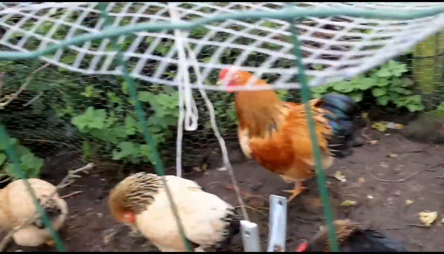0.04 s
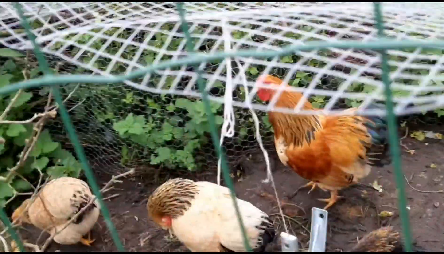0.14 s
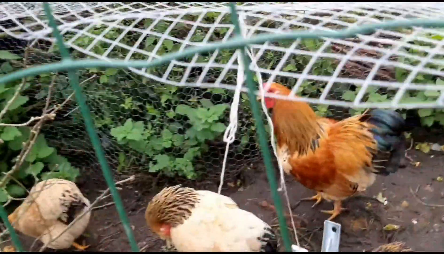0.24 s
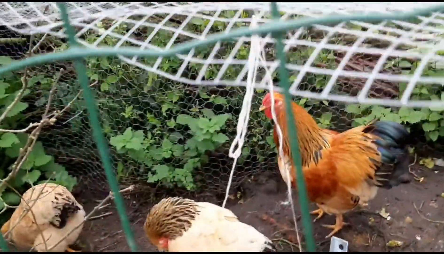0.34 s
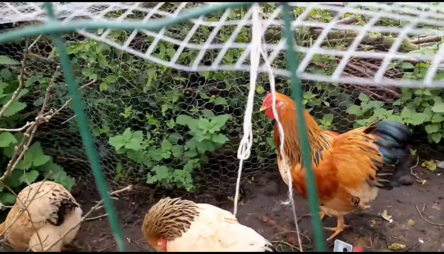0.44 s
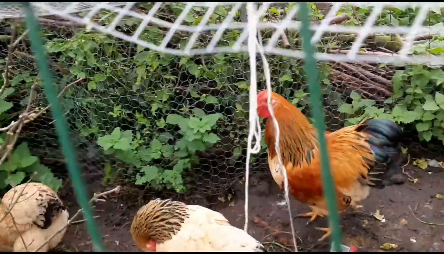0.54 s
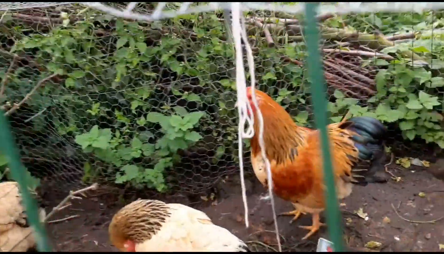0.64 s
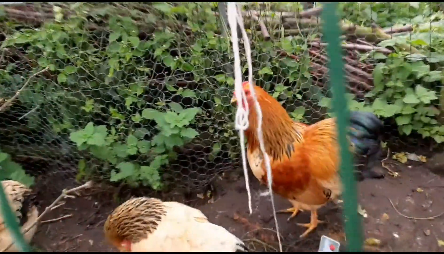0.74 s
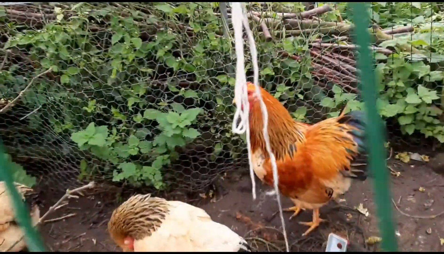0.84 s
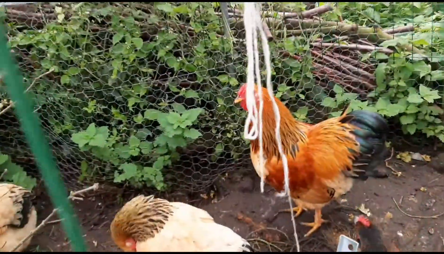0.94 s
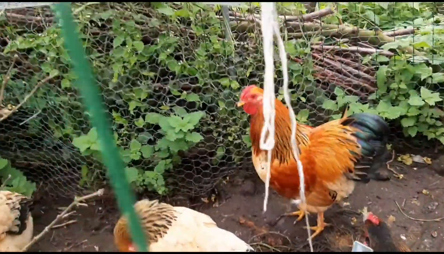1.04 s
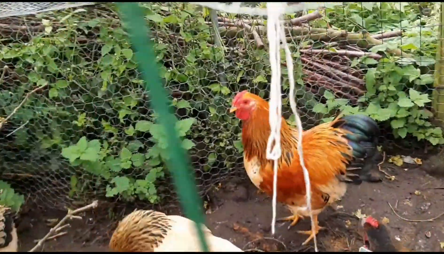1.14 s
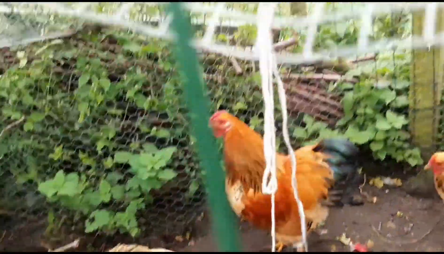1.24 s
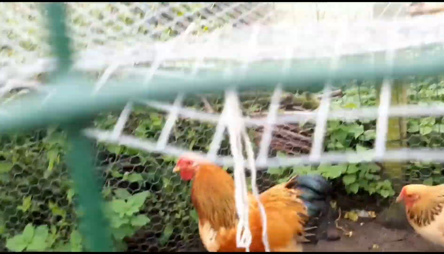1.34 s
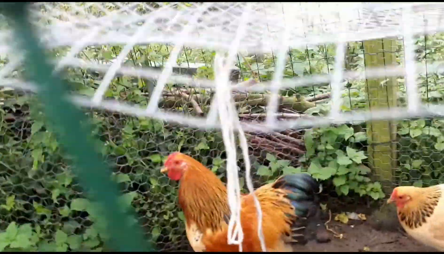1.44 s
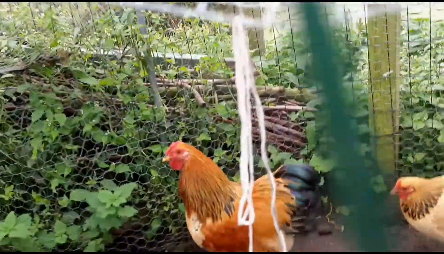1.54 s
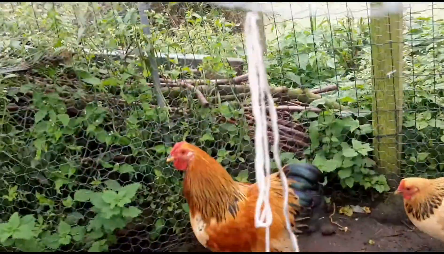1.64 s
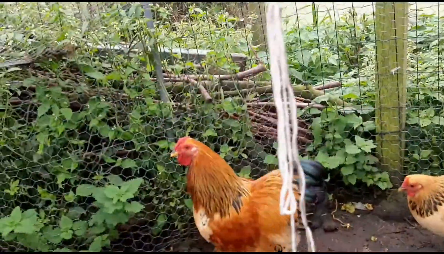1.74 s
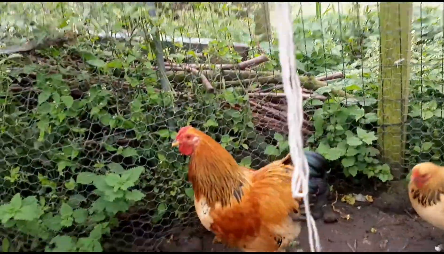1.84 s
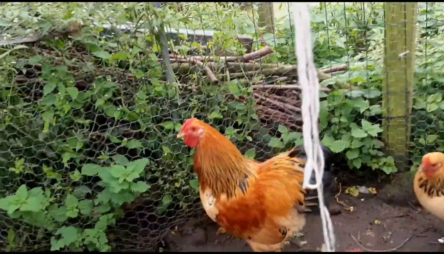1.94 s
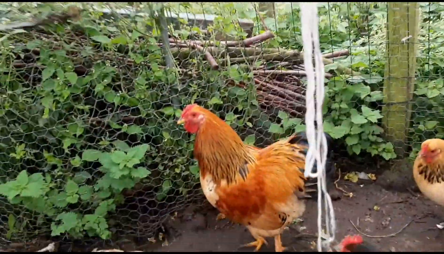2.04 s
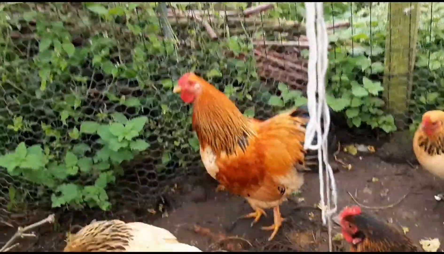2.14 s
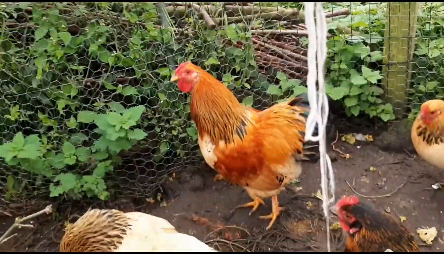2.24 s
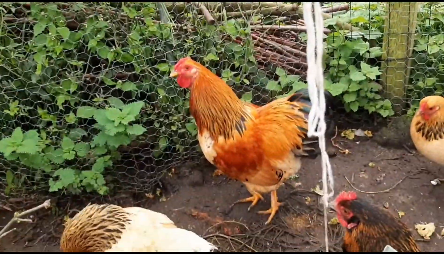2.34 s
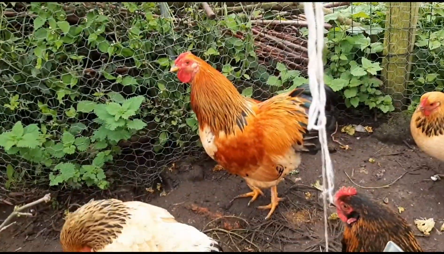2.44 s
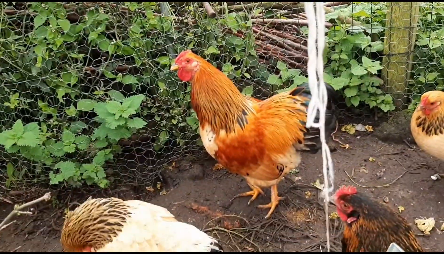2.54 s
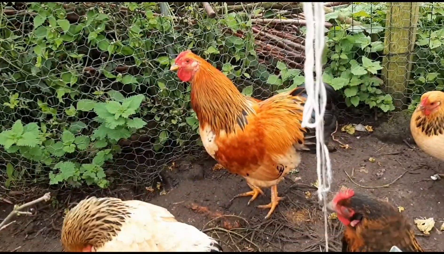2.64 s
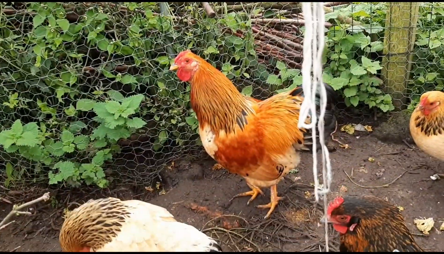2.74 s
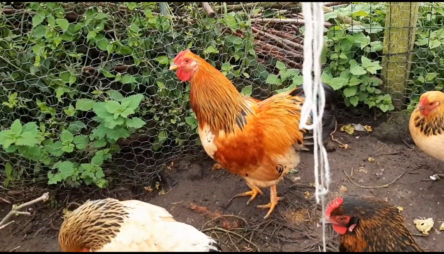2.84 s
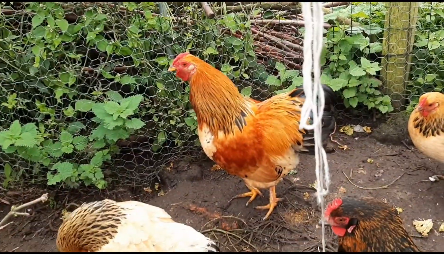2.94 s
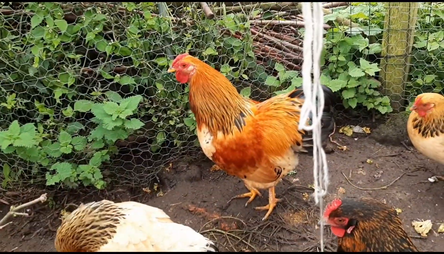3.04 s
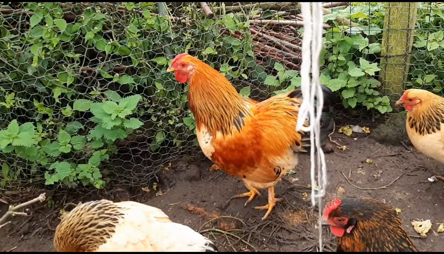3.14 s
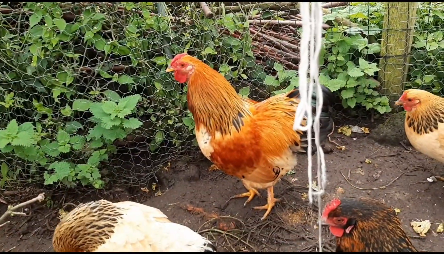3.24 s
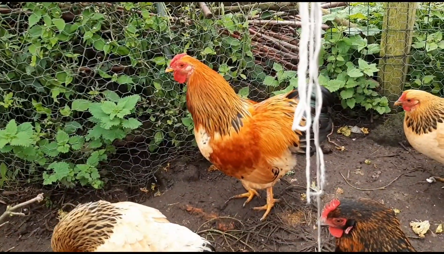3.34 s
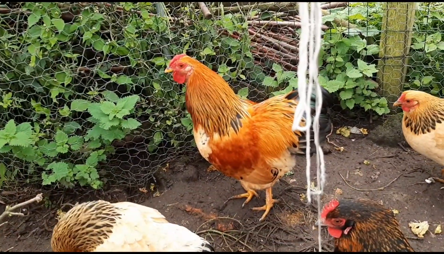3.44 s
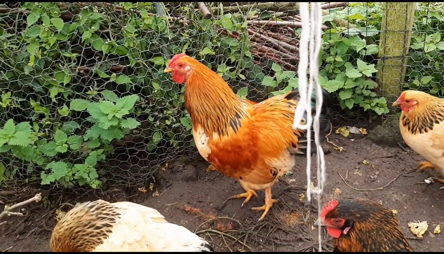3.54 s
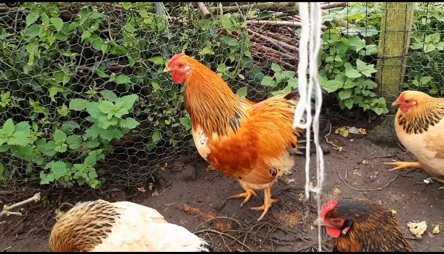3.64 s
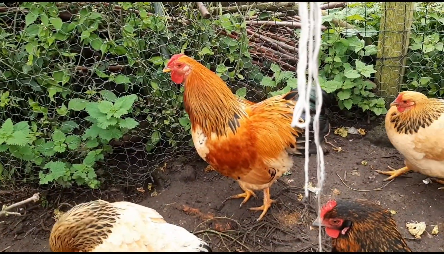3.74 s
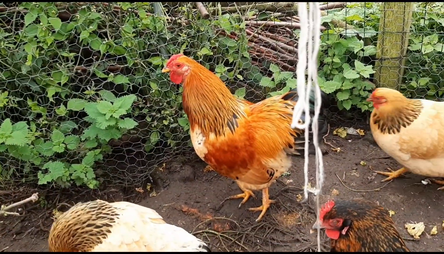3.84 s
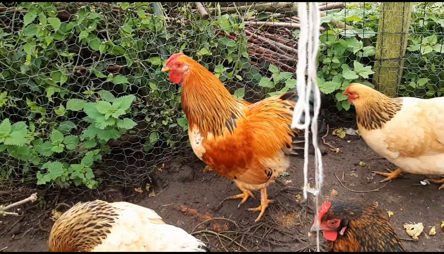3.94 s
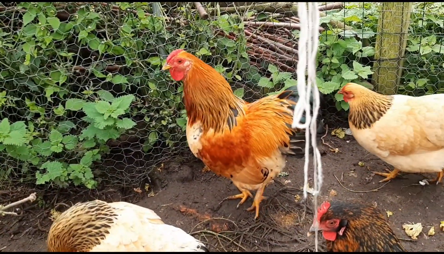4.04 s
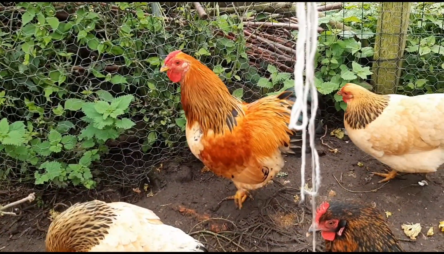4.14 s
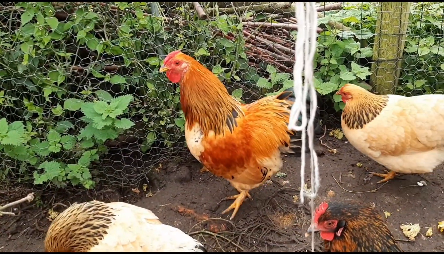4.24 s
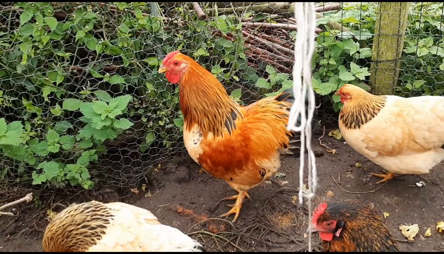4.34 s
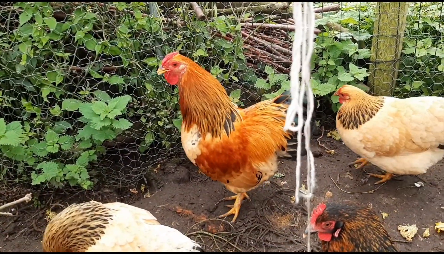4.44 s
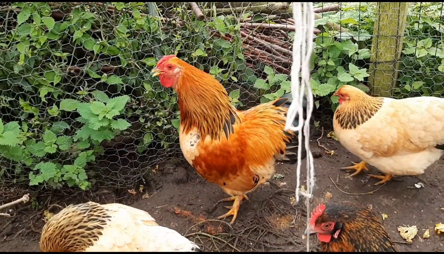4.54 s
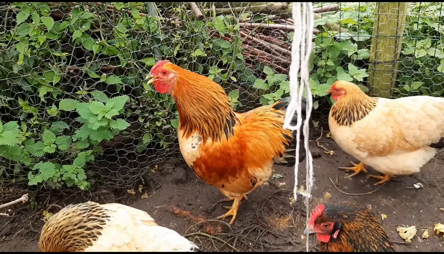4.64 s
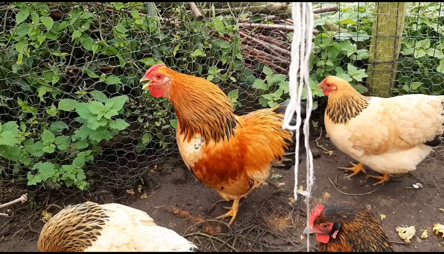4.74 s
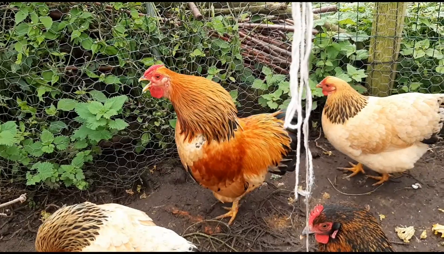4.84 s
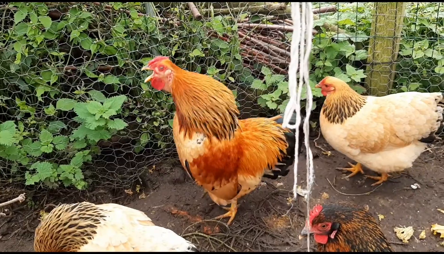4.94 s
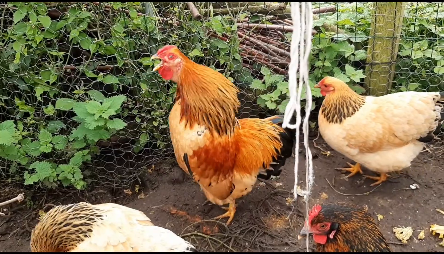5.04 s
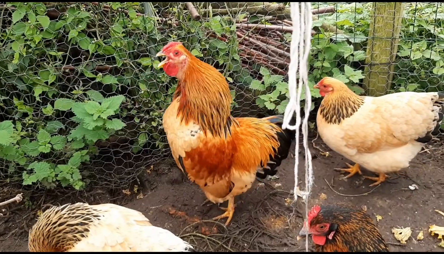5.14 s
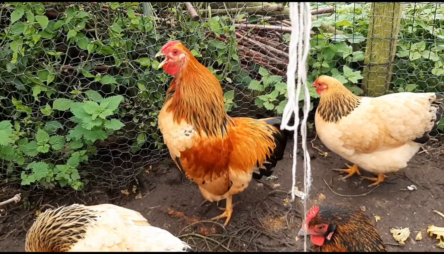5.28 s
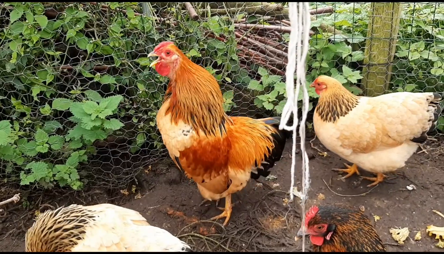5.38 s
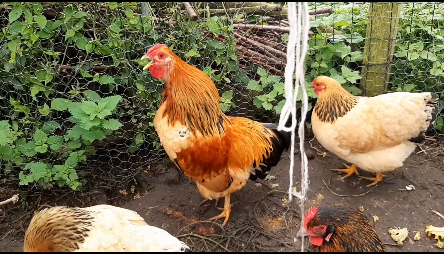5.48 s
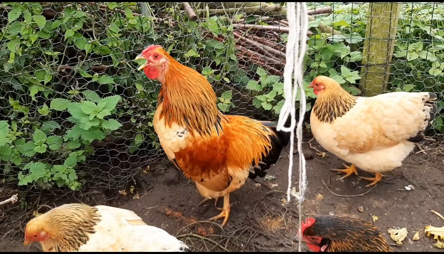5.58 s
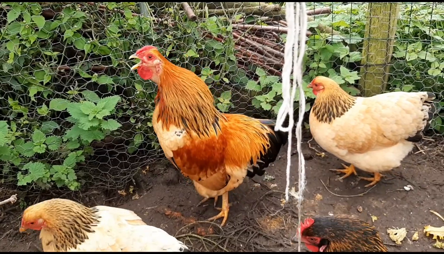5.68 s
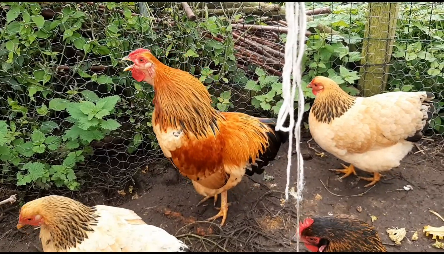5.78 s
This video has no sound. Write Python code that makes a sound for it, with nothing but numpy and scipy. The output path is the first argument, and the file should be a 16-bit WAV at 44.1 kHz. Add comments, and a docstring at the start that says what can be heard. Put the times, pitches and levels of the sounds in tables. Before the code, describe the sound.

A backyard chicken run heard through a hand-held phone, with treble cut off at the very top. From 0 to about 1.7 s netting drags over the phone in short, uneven crackling strokes, with dry twig-like ticks and sharp snaps carrying dull knocks; the hardest cluster comes at 0.8-0.9 s, another at 1.25-1.35 s. Lighter brushing and ticks continue until about 2.5 s, then fade to sparse clicks. Low, buffeting air rumble and a very faint hush lie beneath. Between 3.0 and 4.0 s a hen gives a few soft, short, bending clucks. A crisp tick falls at 4.14 s and the rumble swells near 4.9 s. At 5.07 s a rooster crows, far louder than everything else: two hoarse, raspy syllables run together until 5.29 s, a brief gap, then at 5.34 s a note cracks sharply upward, settles clear and bright, and holds until the cut near 5.8 s.

```python
"""A rooster crows: two hoarse short syllables, run together, then after a brief gap a high cracked note
that is held to the end. Before it a hen gives a few soft clucks. Both voices are sums of harmonics.
A hand-held phone is pushed under the netting of a backyard chicken run: the net scrapes, ticks and snaps
close to the microphones, built from tiny random slips that ring. Filtered noise makes a low rumble of
moving air and a faint hush."""
import sys
import numpy as np
from scipy import signal
from scipy.fft import rfft, irfft
from scipy.io import wavfile
from scipy.ndimage import uniform_filter1d

SR = 44100
rng = np.random.default_rng(int(sys.argv[2]) if len(sys.argv) > 2 else 0)


def transcribe(u):
    """Save the signal u as a 16-bit wav file named by the first command-line argument.

    u: samples, shape (n,) or (channels, n), limited to [-1, 1]; the rate is SR.
    q: integer samples, one column per channel.
    """
    v = np.clip(np.atleast_2d(u).T, -1, 1)
    q = np.round(v * 32767).astype(np.int16)
    wavfile.write(sys.argv[1], SR, q)


N = 256220
T = np.arange(N) / SR


def undb(db):
    """Decibels to gain."""
    return 10 ** (np.asarray(db) / 20)


def curves(rows):
    """Each column of a table, joined by straight lines in time."""
    s, *columns = np.transpose(rows)
    return [np.interp(T, s, c) for c in columns]


def unit(x):
    """Scale to rms 1."""
    return x / np.sqrt(np.mean(x ** 2))


def gain_at(hz, points):
    """Gain at any frequency, read between the points of a colour table."""
    f, db = np.transpose(points)
    return undb(np.interp(np.log(hz + 1), np.log(f), db))


def colour(x, points):
    """Filter with the given colour and unit power gain, without pre-echo; it falls below the lowest point."""
    hz = np.fft.rfftfreq(2 * N, 1 / SR)
    low_fall = np.clip(hz / points[0][0], 1e-2, 1) ** 2
    gain = unit(gain_at(hz, points) * low_fall)
    # folding the cepstrum makes the filter respond only after its input
    cepstrum = irfft(np.log(gain))
    cepstrum[1:N] *= 2
    cepstrum[N + 1:] = 0
    return irfft(rfft(x, 2 * N) * np.exp(rfft(cepstrum)))[..., :N]


def wander(lo_hz, hi_hz):
    """Random motion between two rates, spread 1."""
    band = signal.butter(2, [lo_hz, hi_hz], "band", fs=SR, output="sos")
    return unit(signal.sosfilt(band, rng.standard_normal(N)))


def resonate(x, hz, q):
    """One resonance, with unit power gain."""
    return signal.lfilter(*signal.iirpeak(hz, q, fs=SR), x) * np.sqrt(SR * q / (np.pi * hz))


def ramp(start_s, length_s):
    """Rises from 0 to 1 over the given time and stays there."""
    return np.clip((T - start_s) / length_s, 0, 1)


def swell(s, half_s):
    """Comes and goes smoothly around time s."""
    return np.exp(-((T - s) / half_s) ** 2)


# level of the low rumble, which swells and sinks: time_s, level_db
RUMBLE_LEVEL = [(0, -47), (0.7, -42.5), (1.8, -45.5), (2.2, -43), (3.9, -41.5), (4.3, -41.5), (4.9, -36.5),
                (5.15, -45.5), (5.7, -54)]
# colour of that moving air: frequency_hz, relative_level_db (per Hz)
RUMBLE_COLOUR = [(25, -44.5), (45, -4), (65, 4), (120, 1.5), (200, -6.5), (300, -16), (600, -24),
                 (1300, -57.5)]
# colour of the open air in the garden: frequency_hz, relative_level_db (per Hz)
HUSH_COLOUR = [(300, -13), (1000, -5.5), (2300, -17.5), (3200, -23), (4600, -18.5), (7000, -29.5),
               (11500, -43)]


def air(side_db=-7, buffet_db=3.0, garden_db=-61):
    """Air buffets the microphones, mostly alike on both; the garden adds a faint steady hush."""
    rumble_level_db, = curves(RUMBLE_LEVEL)
    mid, side = rng.standard_normal((2, N))
    ports = mid + undb(side_db) * side * np.array([[1], [-1]])
    buffets = undb(buffet_db * wander(1.64, 24.2))
    rumble = unit(colour(ports, RUMBLE_COLOUR) * buffets) * undb(rumble_level_db)
    hush = colour(rng.standard_normal((2, N)), HUSH_COLOUR) * undb(garden_db)
    return rumble + hush


GRIP_S, SLIP_S = 0.017, 0.025  # a stroke builds up, and dies away after its end


def stroke(s, length):
    """The net grips, slides steadily and lets go."""
    return ramp(s, GRIP_S) * np.exp(-np.maximum(T - s - length, 0) / SLIP_S)


def grains(per_cycle, spread_db):
    """Tiny slips of unequal size, each ringing briefly at its own pitch; the high ones crowd into a hiss."""
    out = np.zeros((2, N))
    for hz in np.geomspace(350, 10500, 13):
        # higher pitches slip more often
        hit = rng.random((2, N)) < per_cycle * hz / SR
        size_db = spread_db * np.minimum(rng.exponential(size=hit.sum()), 4)
        slips = np.zeros((2, N))
        slips[hit] = rng.choice([-1, 1], hit.sum()) * undb(size_db)
        out += resonate(slips, hz, q=3)
    return unit(out)


def patchy(x, depth_db):
    """The contact keeps shifting, so the colour changes in patches of some tens of milliseconds."""
    frames = signal.stft(x, nperseg=256)[2]
    field = rng.standard_normal(frames.shape[1:])
    for _ in range(2):
        field = uniform_filter1d(field, 5, axis=0)  # across frequency
        field = uniform_filter1d(field, 10, axis=1)  # across time
    return signal.istft(frames * undb(depth_db * unit(field)))[1][:, :N]


# between strokes the net brushes lightly, until the phone is clear of it
BRUSH_DB, CLEAR_S, CLEARING_DB_PER_S = -54, 2.44, 14
# strokes of the net over the phone: start_s, length_s, crackle_level_db, drag_level_db
NET_STROKES = [(0.0, 0.16, -43, -47), (0.337, 0.11, -45, -47.5), (0.464, 0.044, -37.5, -63),
               (0.59, 0.14, -43, -45.5), (0.804, 0.12, -44, -43), (0.973, 0.088, -44.5, -61),
               (1.146, 0.086, -44, -67), (1.25, 0.097, -39.5, -42.5), (1.615, 0.075, -44.5, -41),
               (1.964, 0.37, -49.5, -58), (2.532, 0.037, -48.5, -51)]
# colour of the scraping net: frequency_hz, relative_level_db (per Hz)
CRACKLE_COLOUR = [(250, 1), (480, 0.5), (1500, -9), (3200, -11.5), (6000, -13), (7800, -23), (10500, -19.5),
                  (12000, -49)]
# colour of the hard-pressed drag: frequency_hz, relative_level_db (per Hz)
DRAG_COLOUR = [(200, -21.5), (450, 4), (1100, -7), (1900, -11.5), (5000, -34)]


def scrape(smooth_db=-9, stutter_db=-2.5):
    """Net and cord slide over the phone in fits: crackle in a soft hiss, and a duller drag when pressed hard."""
    brush = undb(BRUSH_DB - CLEARING_DB_PER_S * np.maximum(T - CLEAR_S, 0))
    sliding = sum(undb(db) * stroke(s, length) for s, length, db, _ in NET_STROKES)
    pressed = sum(undb(db) * stroke(s, length) for s, length, _, db in NET_STROKES)
    friction = grains(per_cycle=0.07, spread_db=4.8)
    friction = friction + undb(smooth_db) * rng.standard_normal((2, N))
    fits = undb(stutter_db * np.stack([wander(6.4, 35) for _ in range(2)]))
    crackle = colour(unit(friction * fits) * np.hypot(brush, sliding), CRACKLE_COLOUR)
    drag = colour(unit(grains(per_cycle=0.8, spread_db=2.5) * fits) * pressed, DRAG_COLOUR)
    return patchy(crackle + drag, depth_db=2)


CLICK_RISE_S = 0.0005  # how fast cracks and ticks build up


def burst(s, db, pan_db, rise_s, decay_s, tail_db, tail_s):
    """Slips that build up to time s and die away, with a faint tail; db is their level over 10 ms."""
    out = np.zeros((2, N))
    t = T[:SR // 8] - .01  # starts 10 ms before the peak
    rise = np.exp(np.minimum(t, 0) / rise_s)
    decay = np.exp(-np.maximum(t, 0) / decay_s)
    tail = undb(tail_db) * np.exp(-np.abs(t) / tail_s)
    shape = rise * (decay + tail)
    jerks = rng.laplace(size=(2, len(t)))
    jerks[:, np.argmax(shape)] = 0.0  # the very peak sample is silent
    slips = undb(np.array([[pan_db], [-pan_db]]) / 2) * shape * jerks
    start = int((s + t[0]) * SR)
    out[:, start:start + len(t)] = undb(db) * unit(slips) * np.sqrt(SR / 100 / len(t))
    return out


# strands of net catching and slipping: time_s, crack_level_db, thud_level_db, left_minus_right_db
NET_SNAPS = [(0.063, -32.5, -40, -3), (0.147, -32.5, -35, 2.5), (0.449, -37, -33, -6),
             (0.486, -28.5, -34, -9), (0.515, -29.5, -34, 4.5), (0.723, -45, -34.5, -8),
             (0.829, -23.5, -28.5, 9), (0.874, -30, -27.5, 21), (0.898, -25.5, -19.5, -4),
             (1.262, -35, -34, -19), (1.329, -33, -23, 2.5), (1.629, -35.5, -36, 30), (2.257, -38, -40, 5),
             (2.369, -40.5, -37.5, 8)]
# colour of a snap's crack: frequency_hz, relative_level_db (per Hz)
CRACK_COLOUR = [(700, 11), (1500, 2.5), (3200, 1), (6300, -2), (7800, -15), (11500, -20)]
# colour of a snap's thud: frequency_hz, relative_level_db (per Hz)
THUD_COLOUR = [(170, -3.5), (450, 1.5), (750, -0.5), (1300, -11.5), (3000, -56)]


def snaps():
    """Each snap is a burst of slips a few milliseconds long, with a dull knock in the phone's body."""
    cracks = sum(burst(s, db, pan, rise_s=CLICK_RISE_S, decay_s=0.0008, tail_db=-14.0, tail_s=0.011)
                 for s, db, _, pan in NET_SNAPS)
    thuds = sum(burst(s, db, pan, rise_s=0.0019, decay_s=0.0031, tail_db=-24.5, tail_s=0.013)
                for s, _, db, pan in NET_SNAPS)
    return colour(cracks, CRACK_COLOUR) + colour(thuds, THUD_COLOUR)


# small dry ticks of twigs and net, each with its own ring: time_s, level_db, ring_hz
DRY_TICKS = [(0.221, -42, 1750), (0.428, -51, 1100), (0.577, -42.5, 2460), (0.603, -39, 1490),
             (0.633, -48, 2470), (0.649, -35.5, 1670), (0.68, -37, 2520), (0.701, -35, 1670),
             (0.881, -33.5, 2000), (1.036, -40, 2610), (1.104, -42.5, 1800), (1.188, -43, 2370),
             (1.218, -42, 2180), (2.159, -41.5, 4020), (2.187, -41, 1800), (2.318, -47, 2800),
             (2.338, -43.5, 2390), (2.499, -42.5, 3680), (2.69, -42.5, 1870), (2.728, -42, 1980),
             (2.842, -46, 1170), (2.963, -47, 1380), (2.973, -40, 1060), (3.009, -46, 1900),
             (3.051, -46.5, 2600), (3.072, -45, 1090), (3.183, -42.5, 1090), (3.267, -43.5, 1070),
             (3.575, -41, 5100), (3.805, -50, 1290), (4.141, -35.5, 4250), (4.493, -52.5, 1190),
             (4.96, -51.5, 2930)]


def ticks(pan_db=-4.0, q=1.22, dull_hz=7000):
    """Short and without a knock: a dry click that rings one broad resonance."""
    clicks = np.zeros((2, N))
    for s, db, hz in DRY_TICKS:
        click = burst(s, db, pan_db, rise_s=CLICK_RISE_S, decay_s=0.0013, tail_db=-15, tail_s=0.0092)
        clicks += resonate(click, hz, q)
    return signal.sosfilt(signal.butter(4, dull_hz, fs=SR, output="sos"), clicks)


# how much the hen's pitch and loudness waver (shares)
HEN_JITTER, HEN_SHIMMER = 0.018, 0.18
# the hen's clucks, before the low cut: start_s, length_s, start_pitch_hz, middle_pitch_hz, end_pitch_hz, level_db
HEN_CLUCKS = [(3.027, 0.04, 550, 546, 560, -43), (3.056, 0.16, 849, 742, 759, -39),
              (3.326, 0.035, 532, 630, 800, -31.5), (3.36, 0.028, 744, 604, 526, -40),
              (3.608, 0.019, 507, 506, 515, -43), (3.627, 0.037, 817, 684, 750, -37),
              (3.943, 0.041, 708, 647, 684, -31.5)]
# her first three harmonics, one row each: relative_level_db
HEN_HARMONICS = [-4, -9, -36.5]


def hen(low_hz=640):
    """Short notes that bend and waver: two strong harmonics; a low cut lets the octave lead on low notes."""
    voice = np.zeros(N)
    unsteady = 1 + HEN_JITTER * wander(12, 110)
    for s, length, start_hz, middle_hz, end_hz, db in HEN_CLUCKS:
        at = slice(int(s * SR), int((s + length) * SR))
        u = np.linspace(0, 1, at.stop - at.start)
        # a smooth bend through the three pitches
        bend = np.polyfit([0, .5, 1], [start_hz, middle_hz, end_hz], 2)
        hz = np.polyval(bend, u)
        phase = 2 * np.pi * np.cumsum(hz * unsteady[at]) / SR
        harmonics = sum(undb(d) * np.sin((k + 1) * phase) for k, d in enumerate(HEN_HARMONICS))
        arch = np.sqrt(np.abs(np.sin(np.pi * u)))
        voice[at] += np.sqrt(2) * undb(db) * arch * harmonics
    voice = voice * (1 + HEN_SHIMMER * wander(22, 230))
    return signal.sosfilt(signal.butter(6, low_hz, "high", fs=SR, output="sos"), voice)


# a resonance of the open beak, which the octave rings when it comes near
BEAK_HZ, BEAK_WIDTH_HZ = 1778, 216


def beak_ring(hz):
    """How near the octave of this pitch is to the beak's resonance, 0-1."""
    return np.exp(-((2 * hz - BEAK_HZ) / BEAK_WIDTH_HZ) ** 2)


# effort arches over each syllable and lifts pitch and level; at the break the pitch jumps
ARCH_TOP_HZ, BREAK_HZ, BREAK_S, SWELL_DB = 801, 90.7, 0.0044, 13
ATTACK_S, RELEASE_S = 0.0089, 0.024  # the voice starts and stops
SYLLABLE_ROUGH, FRAYED_ROUGH = 0.37, 0.82  # roughness 0-1, and at the frayed end
# the crow's two short syllables, run together: start_s, length_s, start_pitch_hz, end_pitch_hz,
# top_level_db, arch_pointedness (power), break_start_s, break_length_s
SHORT_SYLLABLES = [(5.066, 0.134, 629.8, 722.3, -11, 0.85, 5.129, 0.045),
                   (5.2, 0.094, 712.6, 718.5, -13, 1.7, 5.25, 0.028)]


def short_syllables(octave_db=-11, ring_db=24, overtones_db=-23, overtone_swell=0.064, ring_drain_db=5,
                    fray_s=0.081):
    """Controls: pitch and level arch with effort, the voice breaks upward near each top and frays at the end."""
    hz, db = np.full(N, 1. * ARCH_TOP_HZ), np.full(N, 1. * SHORT_SYLLABLES[0][4])
    for s, length, start_hz, end_hz, top_db, pointed, break_s, held_s in SHORT_SYLLABLES:
        u = ramp(s, length)
        effort = np.abs(np.sin(np.pi * u)) ** pointed
        slack_hz = start_hz + (end_hz - start_hz) * u
        broken = ramp(break_s - BREAK_S / 2, BREAK_S) - ramp(break_s + held_s - BREAK_S / 2, BREAK_S)
        arched_hz = slack_hz + (ARCH_TOP_HZ - slack_hz) * effort + BREAK_HZ * broken
        hz = np.where(T >= s, arched_hz, hz)
        db = np.where(T >= s, top_db - SWELL_DB * (1 - effort), db)
    end_s, ring = s + length, beak_ring(hz)  # end of the last syllable
    sounding = ramp(SHORT_SYLLABLES[0][0], ATTACK_S) - ramp(end_s - RELEASE_S, RELEASE_S)
    upper_db = overtones_db + overtone_swell * (db - db.max()) - ring_drain_db * ring
    rough = SYLLABLE_ROUGH + (FRAYED_ROUGH - SYLLABLE_ROUGH) * ramp(end_s - fray_s, fray_s)
    return sounding, hz, db, octave_db + ring_db * ring, upper_db, rough


# the cracked start is hoarse until the voice settles
SETTLES_S, SETTLE_S = 5.432, 0.012
CRACKED_ROUGH, HELD_ROUGH = 0.56, 0.06  # roughness 0-1
# the long note that follows, cracked and high, then held: time_s, pitch_hz, level_db (first two harmonics)
HELD_NOTE = [(5.338, 731.4, -18.5), (5.344, 825, -16), (5.36, 1012, -12), (5.404, 1034, -13),
             (5.418, 998, -13.5), (5.436, 893, -13), (5.46, 889, -14), (5.546, 928, -15),
             (5.596, 930.4, -15), (5.714, 874.5, -15.5), (5.8, 878, -17.5)]


def long_note(octave_db=-5, ring_db=6, brighten_db_per_s=20, overtones_db=-12, attack_s=0.0095):
    """Controls of the last note: a hoarse crack settles into a clear tone, whose octave slowly takes over."""
    hz, db = curves(HELD_NOTE)
    start_s = HELD_NOTE[0][0] - attack_s / 2
    brightness_db = octave_db + ring_db * beak_ring(hz) + brighten_db_per_s * np.maximum(T - start_s, 0)
    rough = CRACKED_ROUGH + (HELD_ROUGH - CRACKED_ROUGH) * ramp(SETTLES_S - SETTLE_S / 2, SETTLE_S)
    return ramp(start_s, attack_s), hz, db, brightness_db, db + overtones_db, rough


RASP = 1.6  # weight of noise among the overtones; it grows with roughness squared
# a rough voice makes its overtones patchier (dB) and less steady in time (factor)
ROUGH_FLICKER_DB, ROUGH_BLUR = 4, 2.5
SLACK_SIDE = 0.905  # pitch of the slacker side as a share of the leading one
# colour of windpipe and open beak above the second harmonic: frequency_hz, relative_level_db
THROAT_COLOUR = [(2200, 17), (2750, 0), (3150, -1), (3500, 11), (3740, 10.5), (4050, -2.5), (4600, -3),
                 (5400, -9), (6400, 2.5), (7400, -21.5), (10500, -14.5)]


def syrinx(hz, db, octave_db, upper_db, rough, alternation, clash, jitter=0.0033, shimmer=0.13,
           tremble=0.0047, flicker_db=3, hiss_db=-35, blur=0.48):
    """Harmonics of the syrinx through the throat; uneven cycles make it hoarse, alternating ones add half lines."""
    hz = hz * (1 + tremble * wander(16.0, 62) + jitter * rough * wander(58, 500))
    phase = 2 * np.pi * np.cumsum(hz) / SR
    # the level is shared between the first two harmonics
    first_gain = undb(db) / np.hypot(1, undb(octave_db))
    first = first_gain * np.sin(phase)
    octave = np.sin(2 * phase + 1)
    # out of step, the slacker side adds its own unsteady octave and a combination tone above
    slack = SLACK_SIDE * phase + wander(30, 200) / 3
    rival = np.sin(2 * slack) + np.sin(4 * phase - 2 * slack) / 2

    orders = np.arange(3, 17)
    patchiness_db = flicker_db + ROUGH_FLICKER_DB * rough
    weights = np.array([gain_at(k * hz, THROAT_COLOUR) * undb(patchiness_db * wander(2.2, 30)) for k in orders])
    weights /= np.sqrt(np.sum(weights ** 2, axis=0))
    # the higher the overtone, the less steady its timing
    smear = blur * (1 + ROUGH_BLUR * rough)
    overtones = np.zeros(N)
    for k, weight in zip(orders, weights):
        timing = smear * (k / 10) ** 2 * wander(25, 190)
        overtones += np.sqrt(2) * weight * np.sin(k * phase + k * k + timing)

    # turbulent air escapes once a cycle and rings the same throat; in a hoarse voice it replaces the overtones
    jet = rng.standard_normal(N) * (1 + np.cos(phase))
    puffs = unit(colour(jet, [(1200, 4.5)] + THROAT_COLOUR))
    noisy = np.clip(RASP * rough ** 2 + clash / 3 + undb(hiss_db), 0, 1)
    # every other cycle is weaker: lines appear halfway between the harmonics
    swing = alternation * np.cos(phase / 2)
    upper = undb(upper_db) * (np.sqrt(1 - noisy ** 2) * overtones * (1 + swing / 2) + noisy * puffs)
    leading = octave * (np.sqrt(1 - clash ** 2) + swing / 2)
    second = first_gain * undb(octave_db) * (leading + clash * rival / 2)
    low = np.sqrt(2) * (first + second)
    return low * (1 + shimmer * rough * wander(42, 710)) + upper


# brief screeches high in the throat: middle_s, half_length_s, centre_hz, level_db
THROAT_SCREECHES = [(5.104, 0.016, 6350, -31), (5.231, 0.01, 6370, -34.5), (5.442, 0.008, 5400, -31)]


def screeches(q=10):
    """Air forced through the tight syrinx rings a narrow, high resonance."""
    jet = rng.standard_normal(N)
    return sum(undb(db) * swell(s, half_s) * unit(resonate(resonate(jet, hz, q), hz, q))
               for s, half_s, hz, db in THROAT_SCREECHES)


# moments when strong and weak cycles alternate: middle_s, half_length_s, depth (0-1)
CYCLE_DOUBLINGS = [(5.367, 0.043, 1), (5.739, 0.024, 0.85)]
# moments when the two sides of the syrinx fall out of step: middle_s, half_length_s, depth (0-1)
SIDE_CLASHES = [(5.271, 0.019, 0.62), (5.365, 0.022, 1)]


def rooster():
    """One crow from the syrinx: the short syllables, a brief gap, then the long note."""
    opening, ending = short_syllables(), long_note()
    sounding, *controls = np.where(ending[0] > 0, ending, opening)
    alternation = sum(depth * swell(s, half_s) for s, half_s, depth in CYCLE_DOUBLINGS)
    clash = np.clip(sum(depth * swell(s, half_s) for s, half_s, depth in SIDE_CLASHES), 0, 1)
    voice = sounding * (syrinx(*controls, alternation, clash) + screeches())
    # the small beak radiates almost nothing below the fundamental
    return signal.sosfilt(signal.butter(4, 560, "high", fs=SR, output="sos"), voice)


def place(x, pan_db, lag_s):
    """Left is louder than right by pan_db (negative: softer), and right hears the source lag_s later."""
    return np.stack([x * undb(pan_db / 2), np.interp(T - lag_s, T, x) * undb(-pan_db / 2)])


def yard(x, t60_s=0.27, wet_db=-24):
    """Ground, fence and hedge scatter a short, thin echo."""
    t = T[:SR // 2]
    echo = rng.standard_normal((2, len(t))) * undb(-60 * t / t60_s) * (t > .004)
    echo = uniform_filter1d(echo, size=3, axis=1)  # leaves and soil swallow the treble
    echo /= np.sqrt(np.sum(echo ** 2, axis=1, keepdims=True))
    return undb(wet_db) * signal.fftconvolve(x[None], echo, axes=1)[:, :N]


def scene():
    """The birds in the yard, the net and the air right at the phone."""
    cock, clucks = rooster(), hen()
    birds = place(cock, pan_db=-1.5, lag_s=0.00012) + place(clucks, pan_db=2.0, lag_s=0)
    birds = birds + yard(cock + clucks)
    return birds + air() + scrape() + snaps() + ticks()


TOP_HZ = 11700


def record(dry):
    """The phone cuts everything above its top frequency steeply."""
    return signal.sosfilt(signal.ellip(8, .2, 70, TOP_HZ, fs=SR, output="sos"), dry)


dry = scene()
out = record(dry)
transcribe(out)
```